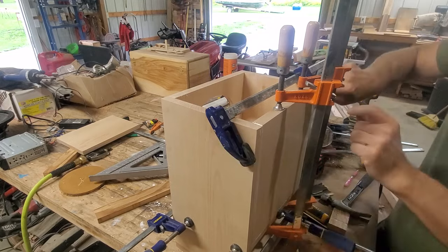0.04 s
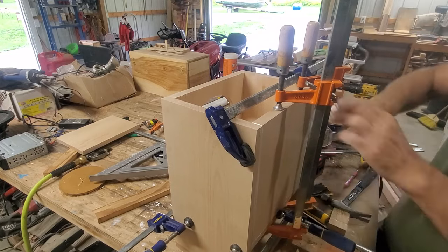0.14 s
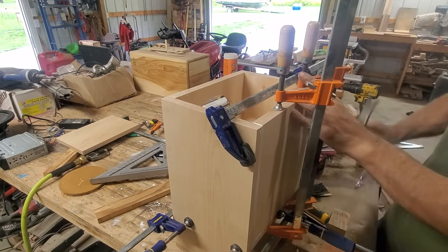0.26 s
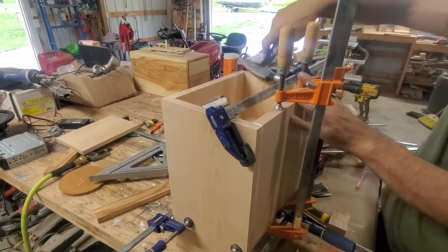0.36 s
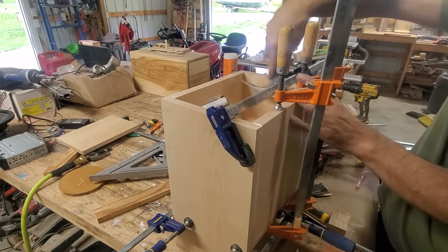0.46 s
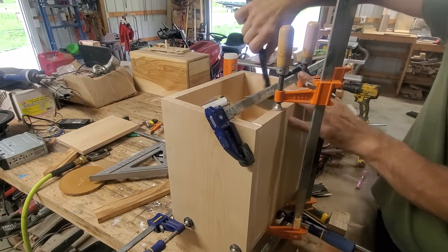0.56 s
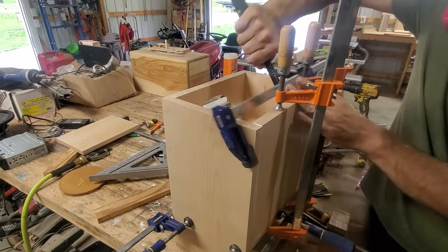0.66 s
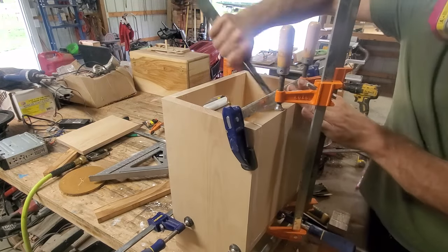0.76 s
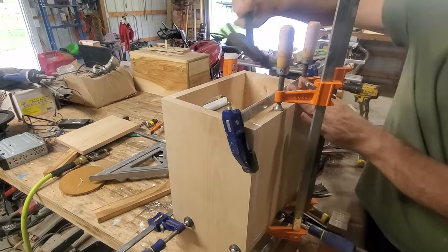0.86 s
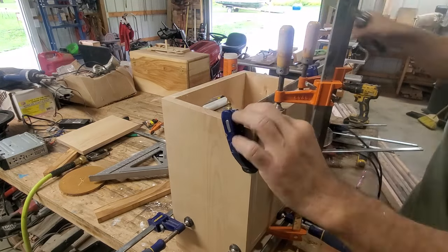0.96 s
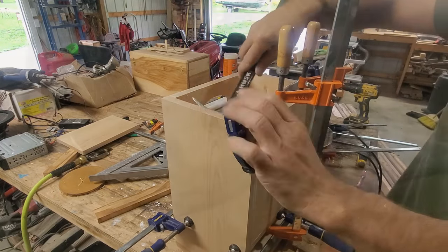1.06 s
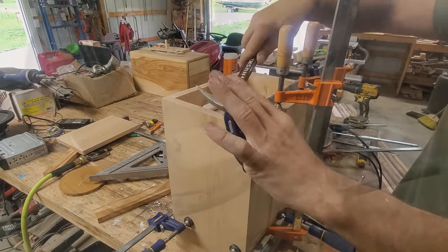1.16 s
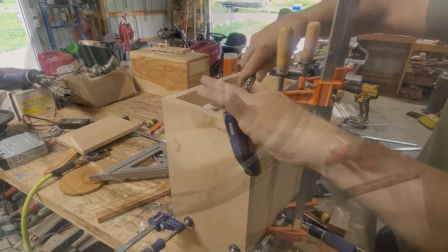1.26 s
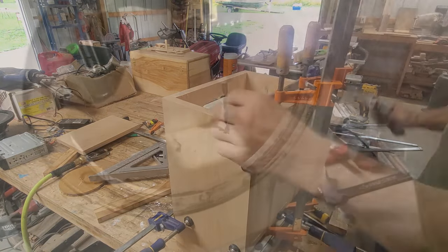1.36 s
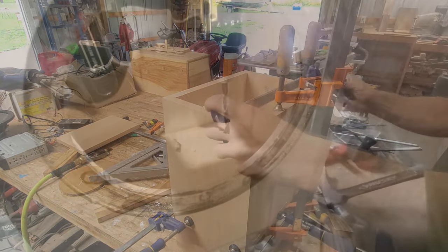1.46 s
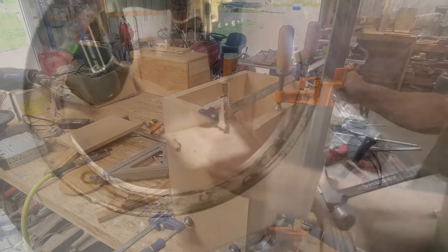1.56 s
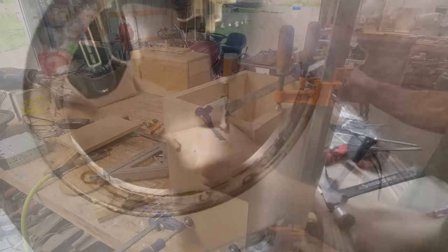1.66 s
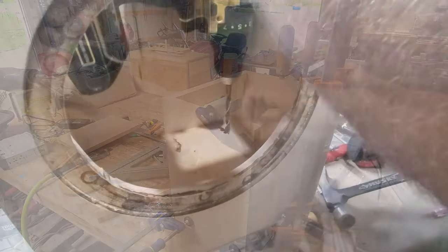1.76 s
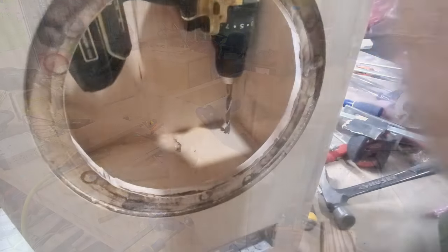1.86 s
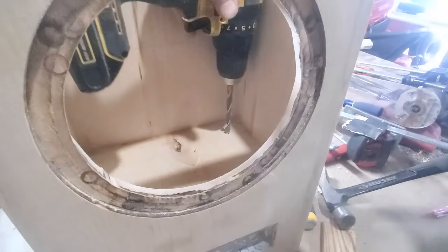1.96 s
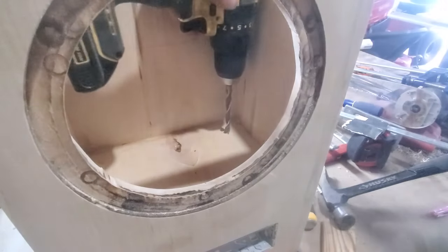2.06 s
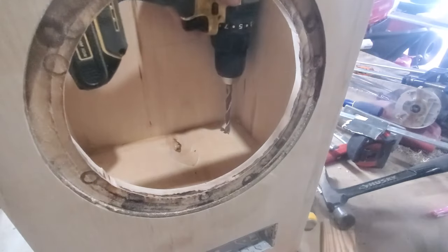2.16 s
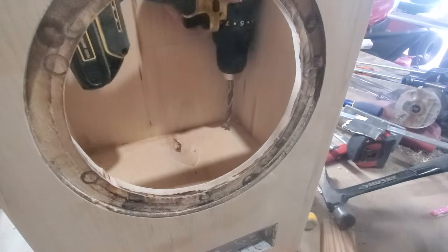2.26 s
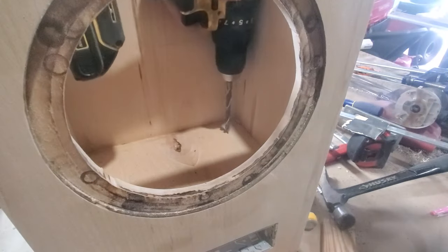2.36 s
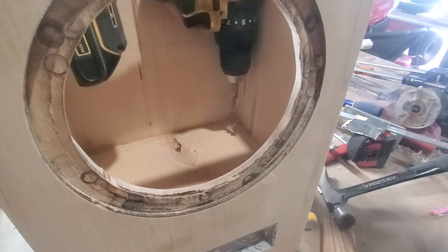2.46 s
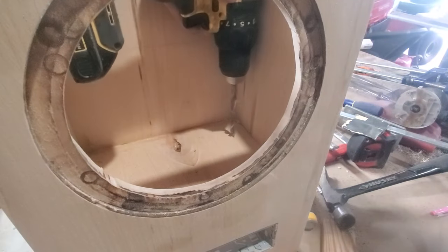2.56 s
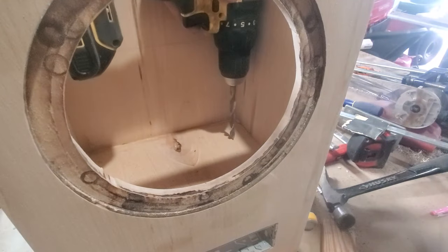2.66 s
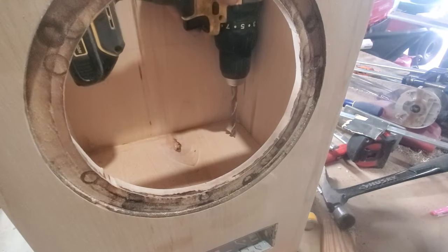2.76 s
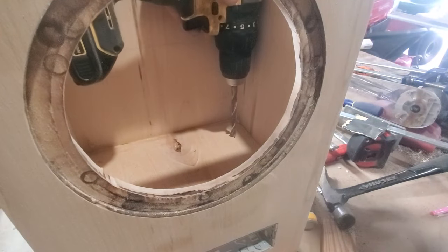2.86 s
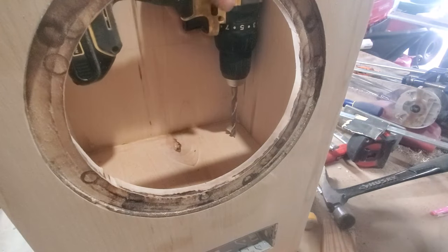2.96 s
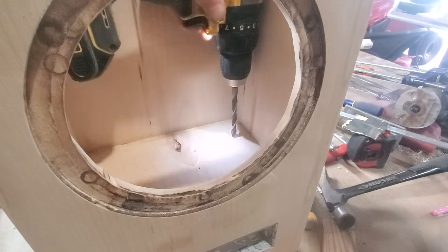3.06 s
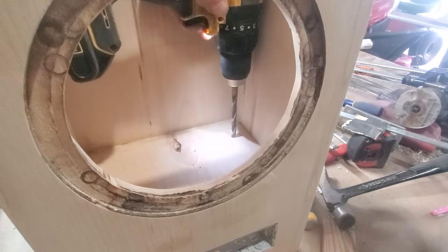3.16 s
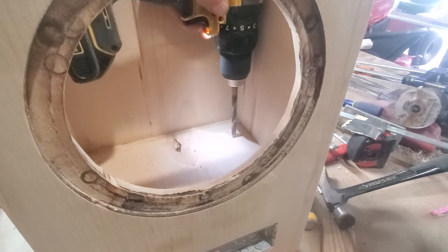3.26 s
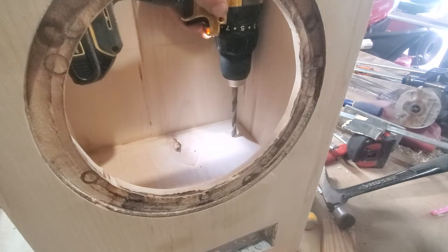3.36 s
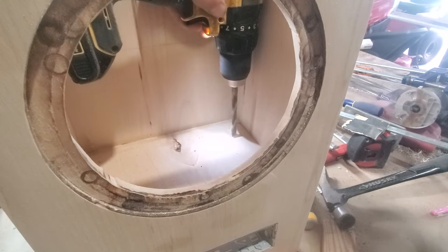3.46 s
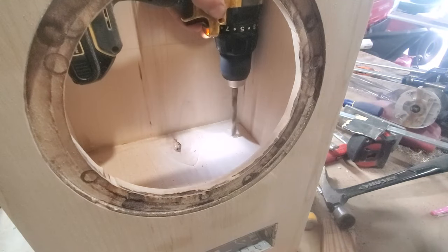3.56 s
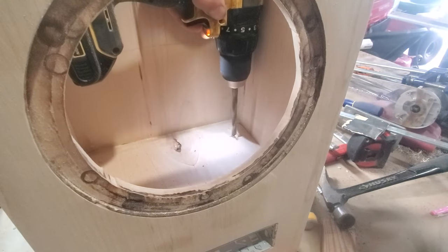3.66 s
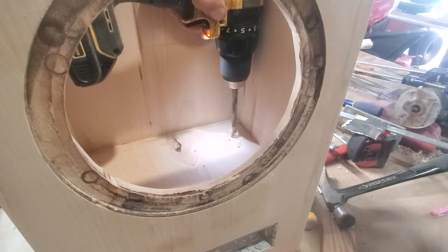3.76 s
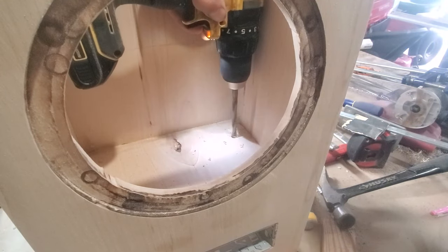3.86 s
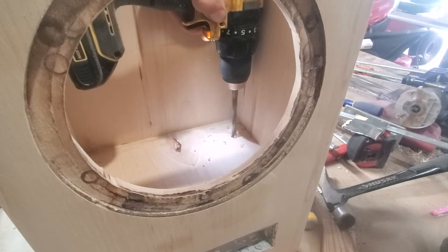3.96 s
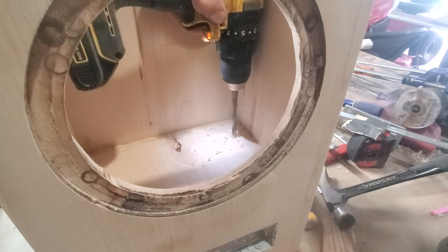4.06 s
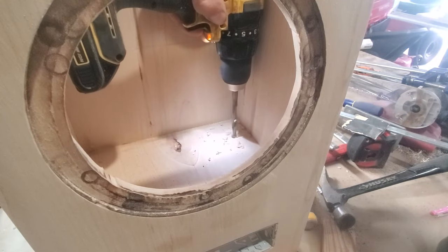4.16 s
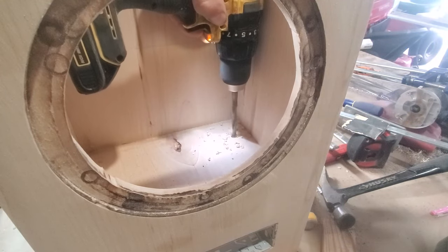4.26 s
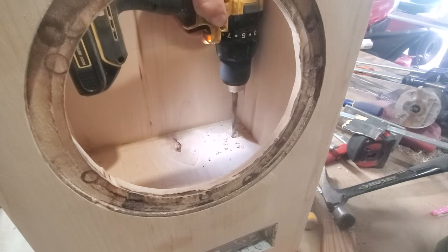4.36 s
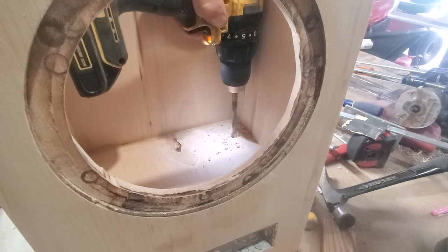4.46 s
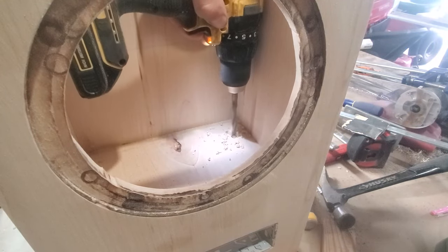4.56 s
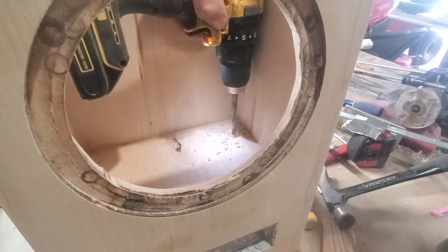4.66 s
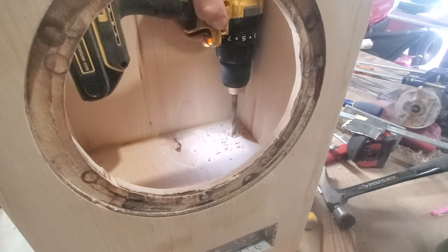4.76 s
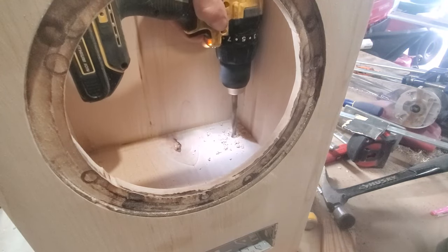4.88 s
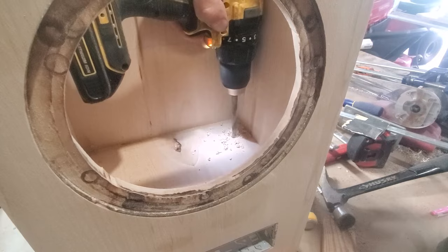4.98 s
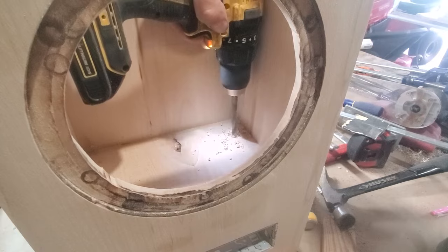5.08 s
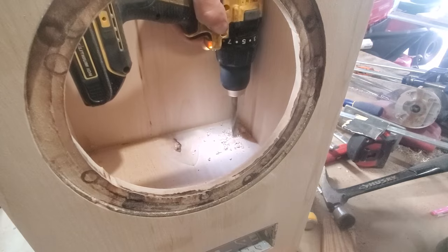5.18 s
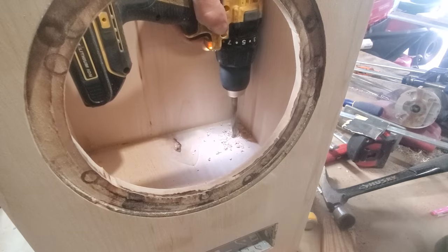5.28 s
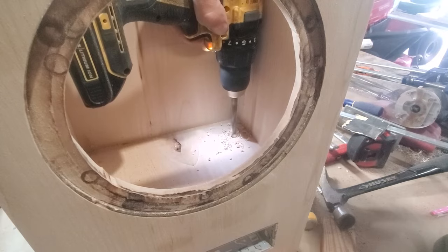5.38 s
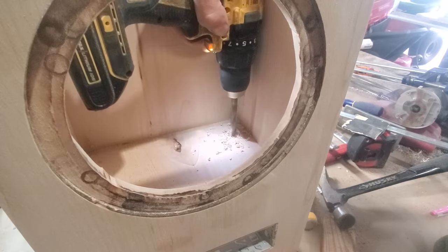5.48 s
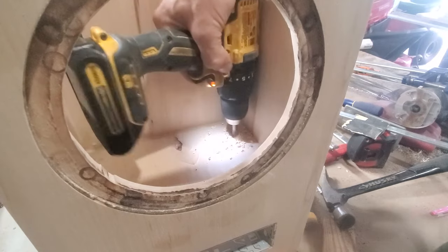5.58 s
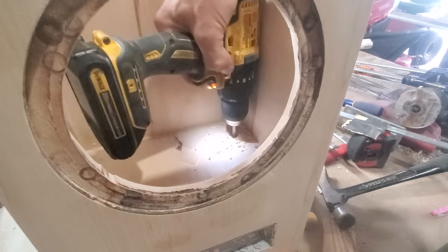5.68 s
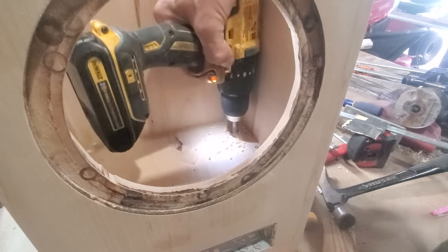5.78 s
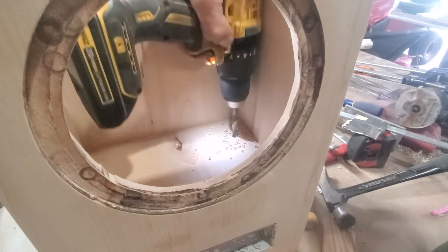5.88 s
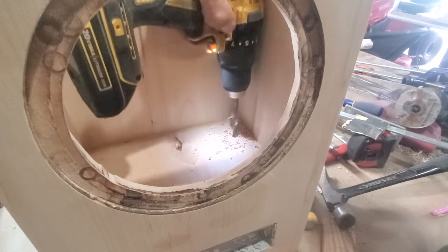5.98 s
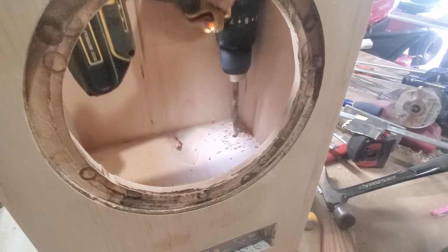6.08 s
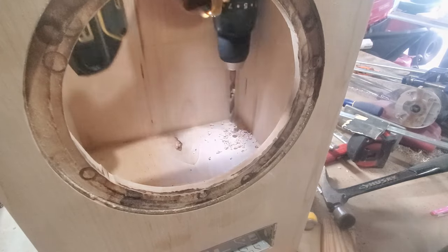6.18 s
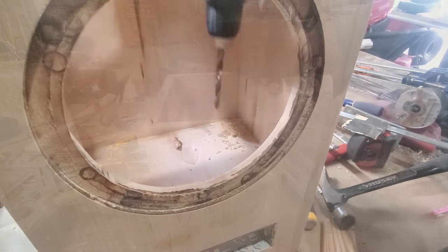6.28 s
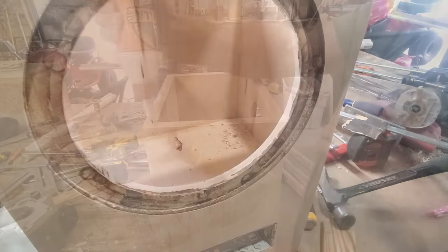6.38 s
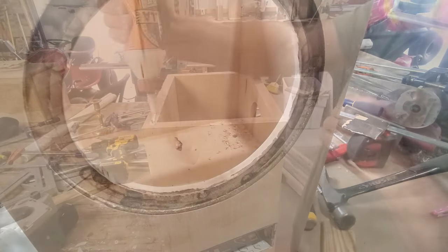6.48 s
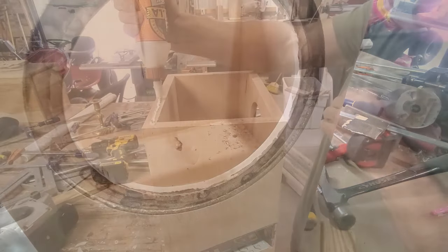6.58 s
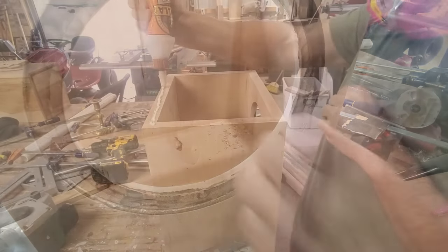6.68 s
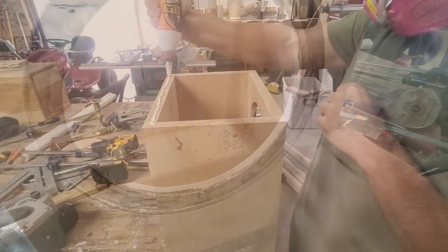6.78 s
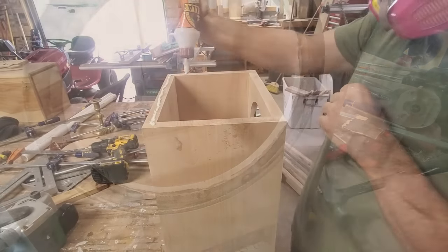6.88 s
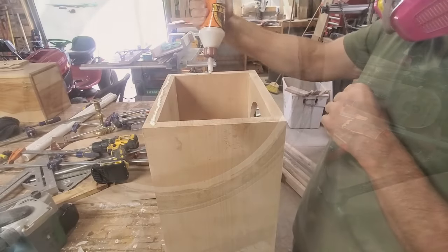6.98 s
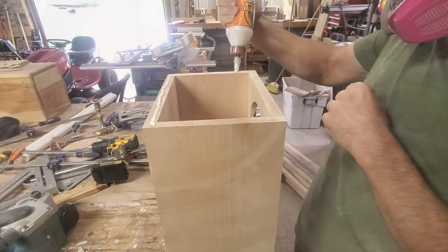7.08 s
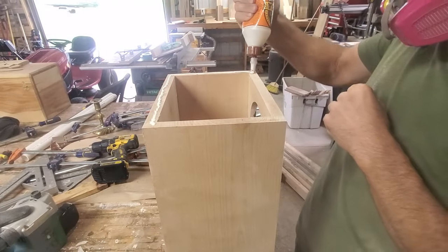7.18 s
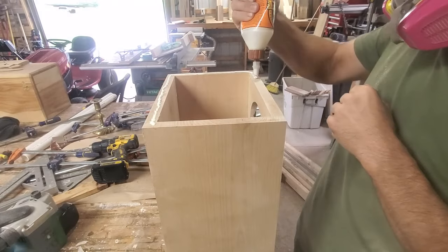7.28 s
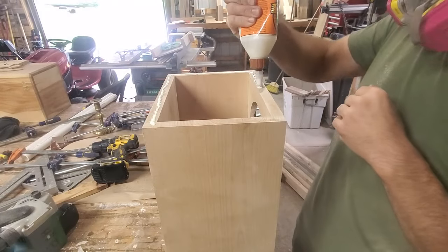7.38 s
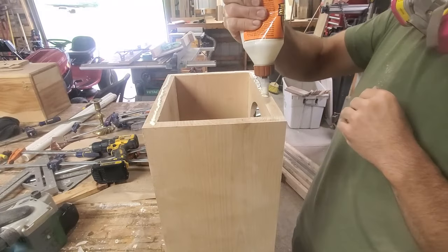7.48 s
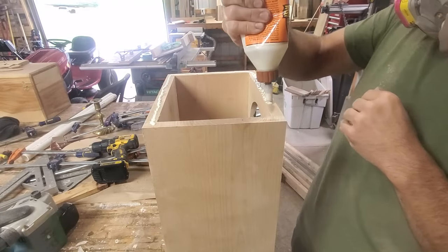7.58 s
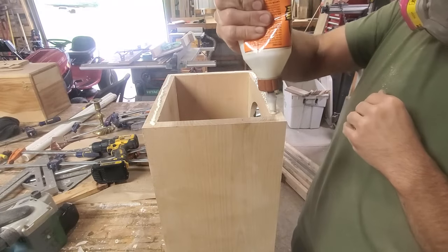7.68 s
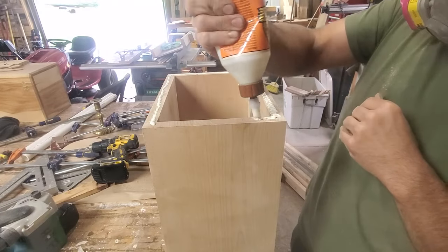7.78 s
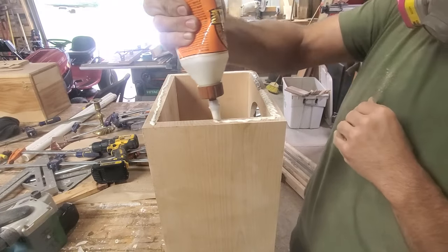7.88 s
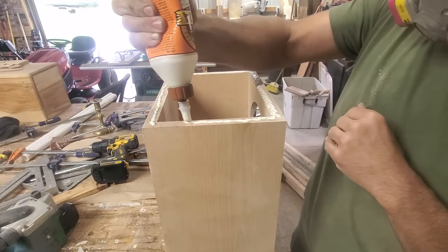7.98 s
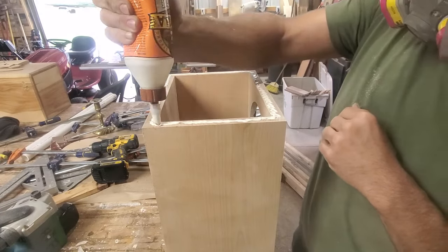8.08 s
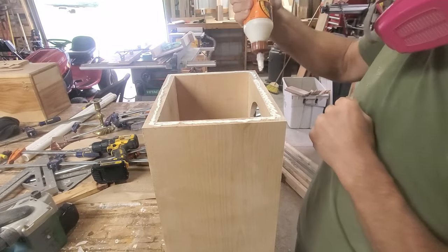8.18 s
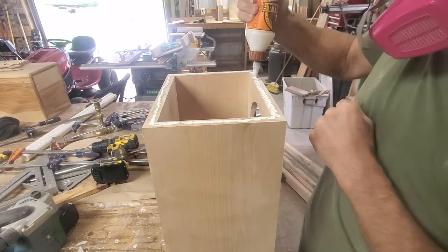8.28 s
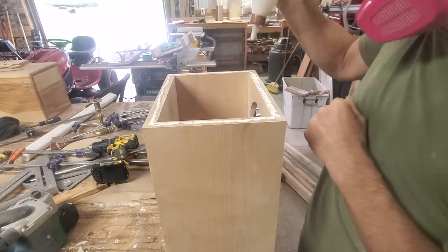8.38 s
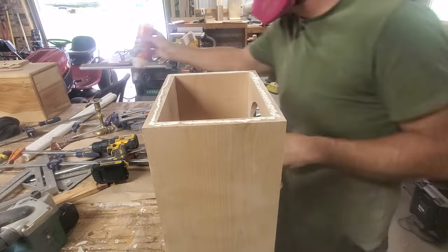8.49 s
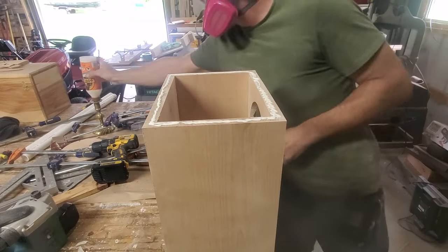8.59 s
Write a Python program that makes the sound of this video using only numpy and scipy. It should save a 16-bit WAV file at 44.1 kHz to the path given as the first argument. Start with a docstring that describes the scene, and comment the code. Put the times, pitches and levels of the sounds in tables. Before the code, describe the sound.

In a quiet workshop, bar clamps rap a plywood box in a quick irregular flurry of dry wooden knocks and metal clicks. After light rubbing and a few softer bumps, a cordless drill starts, skates, bores steadily with a gritty whine, speeds up on breaking through, squeals while withdrawn and stops abruptly. Faint handling crackles and two soft bumps follow. Close microphone, little reverberation.

```python
"""A quiet workshop: bar clamps click and knock on a plywood box in quick dry raps, made of ringing modes and noise.
A cordless drill slides into the box and bores a hole: wavering gear tones over pulsing chip noise.
It speeds up as the bit breaks through, squeals on the way back out in gliding tones and stops dead.
A glue bottle crackles faintly in short resonant noises, then two soft bumps fall on the bench."""
import sys
import numpy as np
from scipy import signal
from scipy.fft import rfft, irfft
from scipy.io import wavfile
from scipy.ndimage import uniform_filter1d

SR = 44100
rng = np.random.default_rng(int(sys.argv[2]) if len(sys.argv) > 2 else 0)


def wav_record(signal):
    """Record a signal, one row per channel, as 16-bit PCM in the file named by sys.argv[1]."""
    frames = np.transpose(np.atleast_2d(signal))
    bounded = np.clip(frames, -1, 1)
    # unit amplitude maps onto the largest positive 16-bit level
    quanta = np.round(bounded * 32767).astype(np.int16)
    wavfile.write(sys.argv[1], SR, quanta)


N = 381005
TIME = np.arange(N) / SR
LEFT_RIGHT = np.array([[1], [-1]])

# Still air of the shop. Each row: frequency in Hz, relative level per hertz in dB.
SHOP_SPECTRUM = [(20, -19), (38, -16), (77, -1), (142, -12), (228, -21), (642, -24.5), (1370, -31.5),
                 (4200, -42), (4940, -37), (5530, -46.5), (7950, -42.5), (9140, -49), (12100, -38.5),
                 (16000, -35.5)]
SHOP_DB = -60
# An even stereo balance. Each row: frequency in Hz, left minus right in dB.
CENTRE = [(20, 0), (16000, 0)]

# Knocks on the box. Each row: start in seconds, wood thud, clamp clack and metal tick in dB before
# the layer trims, favoured box pitch in Hz, favoured clamp pitch in Hz.
KNOCKS = [(0.221, -39, -41, -36, 240, 3120), (0.265, -27.5, -38, -43.5, 750, 1110),
          (0.288, -12.5, -19, -22, 775, 1260), (0.309, -21, -26.5, -36, 417, 1230),
          (0.378, -18, -34, -45, 320, 1310), (0.389, -16, -29, -30.5, 585, 1910),
          (0.402, -13, -26.5, -60, 320, 1400), (0.412, -10, -20.5, -53, 380.5, 1400),
          (0.427, -22, -29, -51, 585, 1310), (0.453, -9.5, -15, -38, 580, 2880),
          (0.475, -9, -35, -50, 320, 1103), (0.492, -9, -16.5, -41, 362.6, 1113),
          (0.523, -12.5, -22, -43, 400, 1020), (0.544, -10.5, -16, -38, 396, 1020),
          (0.587, -21.5, -34, -47.5, 322, 1210), (0.625, -26, -42, -70, 320, 1110),
          (0.646, -4, -15, -40.5, 330, 1360), (0.694, -17, -35, -50, 300, 1020),
          (0.699, -8.5, -23.5, -26.5, 593, 1020), (0.757, -10, -22, -43.5, 623, 1020),
          (0.806, -20, -34, -55, 325, 1100), (0.817, -11, -25, -49, 280, 1060),
          (1.066, -30, -28.5, -31, 273, 3140), (1.084, -11.5, -26.5, -65, 320, 1110),
          (1.101, -24, -19, -57, 750, 1310), (1.147, -18.5, -16, -36, 296, 2850),
          (1.169, -19.5, -35, -70, 488, 1110), (1.228, -29.5, -44.5, -65, 320, 1210),
          (1.248, -14.5, -17, -25, 322, 2770), (1.312, -27.5, -41, -73, 320, 1014),
          (1.408, -34, -39, -51.5, 400, 1310), (1.438, -34, -40, -52.5, 400, 1310),
          (1.456, -13, -30, -57, 400, 1020), (1.505, -33, -50, -65, 390, 1020),
          (1.531, -30, -40.5, -55, 567, 1210), (1.882, -24, -32, -54, 275, 1310),
          (1.929, -30, -54, -73, 298, 1910), (2.024, -27.5, -42.5, -57, 240, 1310),
          (2.169, -30, -45, -71, 275, 1110), (2.274, -17.5, -45, -59, 273, 1210),
          (2.447, -41.5, -66, -73, 300, 1105), (2.975, -50, -73, -77.5, 320, 1100),
          (3.126, -38.5, -30.5, -34.5, 322, 1210), (5.616, -12, -21.5, -25, 277, 3120),
          (8.384, -32, -57, -76, 275, 1024), (8.607, -39.5, -64.5, -79.5, 240, 1020),
          (8.624, -24.5, -40.5, -71, 240, 1020)]
# Low bumps of the bench. Each row: start in seconds, level in dB.
BUMPS = [(0.288, -23.5), (.525, -28), (1.101, -31.5), (1.233, -28.5), (2.027, -38), (2.279, -28.5),
         (2.785, -42), (5.555, -25.5), (5.616, -27), (6.065, -34.5), (8.391, -35)]
# Ringing of the plywood box. Each row: frequency in Hz, relative level in dB, t60 in seconds.
BOX_MODES = [(246, -4, .07), (275.5, -3, 0.045), (329, 2.5, 0.041), (393, -1, .045), (510, 0.5, 0.027),
             (587.4, -0.5, 0.042), (670, -3.5, 0.063), (754, -1.5, 0.051), (814, -5.5, 0.053)]
# Ringing of the clamp's bar and jaws. Each row: frequency in Hz, relative level in dB, t60 in seconds.
CLAMP_MODES = [(1017, 2, 0.046), (1124, 1, 0.045), (1187, -1, 0.06), (1313, 0, 0.062), (1423, -1.5, .05),
               (1890, -2.5, 0.03), (2500, -3, 0.031), (2830, -2, 0.04), (3200, -4, 0.031)]
# Colours of clamp rattle, metal tick and bench rumble. Each row: frequency in Hz, relative level per hertz in dB.
CLACK_SPECTRUM = [(500, -18), (750, -1.5), (1050, 0.5), (1350, -1.5), (1700, -4), (2100, -3.5),
                  (2500, -6.5), (2950, -4), (3600, -12), (5000, -27)]
TICK_SPECTRUM = [(2500, -15.5), (4300, 4), (5500, -2), (7500, -0.5), (10000, -6.5), (16000, -9)]
RUMBLE_SPECTRUM = [(20, -12), (50, -5), (78, 4), (110, -3.5), (180, -8.5), (300, -38.5), (900, -91)]
# trims of the knock's layers (dB)
THUD_DB, CLACK_DB, CLAMP_RING_DB, TICK_DB = -3.5, -2.5, -5, -0.5
# each contact favours the modes near one pitch: gain (dB), width (share of that pitch), loss one octave away (dB)
FAVOUR_DB, FAVOUR_WIDTH, FOCUS_DB = 8, .18, 2.5
# from here on the blows come from within the box and its air answers (Hz, s, dB)
INSIDE_FROM_S = 1.7
CAVITY_HZ, CAVITY_T60, CAVITY_DB = 292, .095, 3

# Drill and hands sliding over the wood. Each row: time in seconds, rub in dB and hiss in dB before their trims.
SLIDE = [(1.58, -49, -70), (1.63, -61, -53), (1.936, -69, -66.5), (2.092, -49.5, -56.5),
         (2.162, -47, -57.5), (2.27, -52, -62), (2.31, -62, -81.5), (2.55, -70.5, -87)]
# Colours of the slide. Each row: frequency in Hz, relative level per hertz in dB.
RUB_SPECTRUM = [(250, -1), (450, 1), (620, 3.5), (1000, -5), (1600, -18), (3000, -59)]
RUB_HISS_SPECTRUM = [(530, -36.5), (900, -2.5), (1050, -1.5), (1490, -7), (2860, -7), (5350, -17.5),
                     (10900, -24.5), (16000, -23)]

# Small sounds of hands and tools, with a knock's ring, a crack from the drill and its stopping click.
# Each row: start in seconds, length in seconds, centre in Hz, width in Hz, level in dB.
RUSTLES = [(1.864, 0.084, 530, 70, -44.5), (1.868, 0.03, 1324, 60, -33), (3.028, 0.043, 5000, 7100, -59.5),
           (3.078, 0.029, 1500, 2500, -58), (6.025, 0.028, 4800, 3500, -27.5),
           (6.237, .025, 1250, 600, -31.5), (6.436, 0.013, 1200, 700, -58.5),
           (6.719, 0.097, 2762, 896, -67.5), (7.078, .2, 600, 249.6, -68.5), (7.274, .01, 5010, 8000, -66),
           (7.479, 0.045, 3600, 80.3, -71.5), (7.678, 0.17, 572, 250, -71), (7.947, .025, 1950, 250, -66),
           (8.133, .012, 5000, 8900, -67), (8.254, 0.14, 750, 247, -58), (8.412, 0.059, 6020, 8940, -60.5),
           (8.422, 0.026, 1900, 1200, -55), (8.433, 0.071, 700, 596, -53)]
# the glue bottle crackles faintly as it is squeezed along the rim
GLUE_FROM_S, GLUE_TO_S, GLUE_CRACKLE_S = 6.7, 8.1, .018
GLUE_HZ, GLUE_WIDTH_HZ, GLUE_DB = 2300, 400, -71

# the trigger is squeezed and let go (s)
TRIGGER_ON_S, TRIGGER_OFF_S = 3.126, 6.255
# The motor sags under load and races as the bit breaks through. Each row: time in seconds, turns per second.
SPEED = [(3.16, 290), (3.25, 211), (3.32, 286), (3.43, 286), (3.55, 274), (3.64, 250), (3.72, 238),
         (3.82, 234), (3.87, 270), (3.93, 274.5), (4.07, 271), (4.2, 263), (4.52, 261.5), (4.85, 255),
         (4.98, 257), (5.02, 300), (5.07, 334), (5.13, 319), (5.25, 314), (5.37, 322), (5.51, 313),
         (5.555, 277), (5.6, 299), (5.63, 288), (5.72, 240), (5.81, 307), (5.89, 309), (5.94, 285),
         (6.02, 277), (6.1, 286), (6.19, 294)]
# How hard the bit works. Each row: time in seconds, level in dB before the trims of each layer.
EFFORT = [(3.13, -41.5), (3.15, -50.5), (3.27, -49.5), (3.31, -38.5), (3.52, -38.5), (3.58, -29),
          (3.82, -30), (3.85, -27.5), (4.97, -27), (5.0, -26), (5.55, -25.5), (5.76, -38), (5.81, -24.5),
          (5.9, -31), (6.04, -29.5), (6.1, -35.5), (6.2, -36), (6.25, -30)]
# the motor's speed when labouring and when racing (turns per s)
LOADED_SPEED, RACING_SPEED = 270, 314
# the gears are fully loaded above this effort and run free a little below it (dB)
LOADED_EFFORT_DB, FREE_BELOW_DB = -31, 6
# the bit is leant on harder from here until it is through, then is pulled back with the gears slack
LEAN_S, LEAN_RISE_S, PULL_BACK_S, PULL_BACK_FALL_S = 4.3, .03, 5.52, .4
GEAR_DB, LEAN_GAIN_DB, SLACK_DB, MESH_DB = -4, 1.5, 7, 1
# lowest level of the gear train, before the trims of its tones (dB)
IDLE_MESH_DB = -40
# gearing of the chuck, and the share by which the load makes the speed wobble
MOTOR_TURNS_PER_CHUCK_TURN, WOBBLE = 20, .0025
# spread of a tone's wandering phase at each ear (radians)
PHASE_WANDER_RAD = .25
# The motor's whine. Each row: time in seconds, level in dB.
WHINE = [(3.27, -62), (3.36, -35), (3.5, -47), (3.62, -38), (3.77, -33), (3.83, -38), (3.86, -25),
         (4.6, -25.3), (4.85, -32), (5.1, -30.5), (5.55, -31), (5.6, -26), (5.7, -48), (5.88, -40),
         (5.9, -23.5), (5.95, -38), (6.03, -35), (6.1, -41), (6.15, -28), (6.215, -28), (6.23, -44)]
# Lesser tones of motor and gear train. Each row: multiple of the turning rate, then trims in dB
# running free, while cutting and when racing.
GEAR_ORDERS = [(.75, -28, -21, -13), (2, -20, -11.5, -30), (2.25, -22, -14, -28), (3, -9.5, -18, -5),
               (3.45, -11, -28, -30), (3.75, -28, -17, -22), (6, -17, -15, -19), (9.38, -22, -12, -6),
               (19.6, -28, -14.5, -6.5), (29.4, -26, -15.5, -10), (39.2, -26, -15, -23)]
# Gearbox resonances that lift the main gear tone. Each row: centre in Hz, width in Hz, lift in dB.
GEARBOX = [(1025, 40, 4.5), (1290, 70, 1.5)]
# Housing resonances that lift the lesser gear tones. Each row: centre in Hz, width in Hz, lift in dB.
HOUSING = [(300, 120, 5), (550, 120, 4), (980, 180, 6), (2950, 500, 5), (5140, 200, 7), (6300, 700, 3),
           (7730, 200, 8)]

# Bit and chuck ringing as the tip skates.
# Each row: centre in Hz, width in Hz, level in dB at the labouring speed and above.
SKATING = [(328.5, 50, -49), (1343, 150, -45), (1600, 160, -45.5), (3470, 600, -38), (6330, 150, -41.5)]
SKATE_UNTIL_S, SKATE_FADE_S = 3.55, .15
# loss for every 30 turns per s below the labouring speed (dB)
SKATE_SAG_DB = 7.5

# Colours of box drone, cutting and flying chips. Each row: frequency in Hz, relative level per hertz in dB.
DRONE_SPECTRUM = [(88, -48), (150, -15), (182, -10.5), (240, -10.5), (312, 2.5), (360, -5), (450, -7),
                  (510, -4), (580, -5), (635, -10.5), (800, -13.5), (1040, -44.5), (1760, -120)]
CUTTING_SPECTRUM = [(410, -38), (700, -15.5), (863, -10), (936, -4), (1050, -2.5), (1150, -6), (1310, -8),
                    (1480, -12), (1590, -9), (1740, -11), (2310, -8), (3180, -5.5), (3450, -8.5),
                    (4800, -11.5), (6240, -49.5), (10600, -120)]
CHIP_SPECTRUM = [(2470, -30.5), (4200, -3), (4620, -21), (5020, 0), (5560, 0), (6250, 1.5), (8550, -4),
                 (9300, -4), (15100, -5), (16000, -23.5)]
# Where the drill sits. Each row: frequency in Hz, left minus right in dB.
DRILL_SIDE = [(60, -2), (200, -5.5), (380, -5), (700, 5.5), (1290, -6.5), (2380, -3), (4400, -1.5),
              (8120, -6.5), (15000, 0)]
# trims of the boring layers against the effort; BORING_DB then trims them all
CUTTING_DB, CHIPS_DB, DRONE_DB, RUMBLE_DB, BORING_DB = 6.5, 3, -1, -18.5, -1
# racing throws more chips than it cuts; box and bench fall quiet faster than the bit as it eases off
RACING_DULLS_DB, FULL_EFFORT_DB, BODY_FOLLOWS, RACING_SHAKES_DB = 1.5, -26.5, 1.25, 5
# swing of the noise as each flute bites, in the chips and in the box, and its fast crunch (dB)
FLUTE_CHIPS_DB, FLUTE_BOX_DB, CRUNCH_DB = .7, 2, 1.1

# Short wavering drill tones: box hums, groans and squeals of the bit, and a falling gear tone.
# Each row: start in seconds, length in seconds, start pitch in Hz, end pitch in Hz, level in dB.
SQUEALS = [(3.575, .12, 820, 730, -33), (3.636, 0.096, 562, 548, -26), (3.708, 0.086, 320, 288, -31),
           (4.6, 0.37, 314, 313, -30.5), (4.692, 0.31, 191, 189, -36), (5.007, 0.071, 305, 288, -22),
           (5.33, 0.079, 250, 231, -29), (5.513, 0.062, 2930, 2525, -19), (5.796, 0.086, 290, 280, -27.5),
           (5.934, 0.042, 309.4, 310, -34), (5.979, .1, 5060, 5120, -22), (6.022, 0.024, 1844, 2040, -16.5),
           (6.026, 0.021, 2176, 2560, -13)]

CUTOFF_HZ = 16100


def from_db(db):
    """Decibels to gain."""
    return 10 ** (np.asarray(db) / 20)


def rms_one(x):
    """Scale to unit rms."""
    return x / np.sqrt(np.mean(x ** 2) + 1e-20)


def peak_one(x):
    """Scale each channel so that its loudest few milliseconds have rms 1."""
    power = uniform_filter1d(x ** 2, size=256)
    return x / np.sqrt(power.max(axis=-1, keepdims=True) + 1e-20)


def in_time(rows):
    """Each column of a curve table, sample by sample."""
    s, *columns = np.transpose(rows)
    return [np.interp(TIME, s, column) for column in columns]


def at_hz(points, hz):
    """Read a spectrum on a log-frequency axis."""
    f, value = np.transpose(points)
    return np.interp(np.log(hz + 1e-3), np.log(f), value)


def ramp(start, length):
    """Rises from 0 to 1 and stays there."""
    return np.clip((TIME - start) / length, 0, 1)


def gate(start, stop, rise, t60):
    """Opens quickly at start and dies away after stop."""
    return ramp(start, rise) * from_db(-60 * np.maximum(TIME - stop, 0) / t60)


def blow(t, rise, t60):
    """Envelope of one contact: a brief swell, then a decay."""
    return np.minimum(t / rise, 1) ** 1.3 * from_db(-60 * np.maximum(t - rise, 0) / t60)


def drift(rate):
    """Random wander: normal values of spread 1, rate of them a second, joined by straight lines."""
    knots = rng.standard_normal(N // 20)
    return np.interp(TIME * rate, np.arange(len(knots)), knots)


def white():
    """Stereo noise, unrelated in the two channels."""
    return rng.standard_normal((2, N))


def colour(x, spectrum, side=CENTRE):
    """Give a stereo sound a spectrum and a balance; rms 1."""
    hz = np.arange(N // 2 + 1) * SR / N
    db = at_hz(spectrum, hz) + LEFT_RIGHT * at_hz(side, hz) / 2
    return rms_one(irfft(rfft(x) * from_db(db), N))


def resonant_noise(hz, width_hz, size):
    """Stereo noise through one two-pole resonance; rms 1."""
    r = np.exp(-np.pi * width_hz / SR)
    poles = [1, -2 * r * np.cos(2 * np.pi * hz / SR), r * r]
    return rms_one(signal.lfilter([1, 0, -1], poles, rng.standard_normal((2, size))))


def lift(hz, centre_hz, width_hz, peak_db):
    """Decibels that a tone gains near a resonance."""
    return peak_db / (1 + (2 * (hz - centre_hz) / width_hz) ** 2)


def soften(x, top_hz):
    """Gentle treble roll-off above top_hz."""
    return signal.sosfilt(signal.butter(1, top_hz, fs=SR, output="sos"), x)


def workshop(x, t60, wet_db, wall_hz):
    """Add diffuse reflections from nearby walls and clutter, duller than the direct sound."""
    t = TIME[:SR // 2]
    tail = rng.standard_normal((2, len(t))) * blow(t, rise=.012, t60=t60)
    tail = soften(tail, wall_hz)
    tail /= np.sqrt(np.sum(tail ** 2, axis=1, keepdims=True))
    return x + from_db(wet_db) * signal.fftconvolve(x, tail, axes=1)[:, :N]


def shop_air():
    """Still air of the shop: quiet coloured noise whose level drifts a little."""
    return from_db(SHOP_DB + .76 * drift(4)) * colour(white(), SHOP_SPECTRUM)


def swing(t, hz):
    """A mode's sine at a random phase, reaching the two ears a quarter cycle apart."""
    ear_phase = rng.choice([-1, 1]) * LEFT_RIGHT * np.pi / 4
    return np.sin(2 * np.pi * (hz * t + rng.random()) + ear_phase)


def ringing(t, modes, favoured_hz):
    """One contact on a body: its modes ring, those near the favoured pitch the most."""
    out = 0
    for hz, db, t60 in modes:
        db = db + lift(hz, favoured_hz, FAVOUR_WIDTH * favoured_hz, FAVOUR_DB)
        db = db - FOCUS_DB * np.log2(hz / favoured_hz) ** 2
        level = from_db(db + rng.normal(0, 2.0, (2, 1)))
        out = out + level * blow(t, rise=.0038, t60=t60) * swing(t, hz)
    return peak_one(out)


def knocks():
    """Each knock rings the box, rings and rattles the clamp and ticks; low bench bumps sound at their own times."""
    t = TIME[:SR // 4]
    out = np.zeros((2, N + len(t)))
    # noise beds, wrapped round so that the last blows can ring out
    clamp, metal, bench = (np.pad(colour(white(), spectrum), ((0, 0), (0, len(t))), "wrap")
                           for spectrum in (CLACK_SPECTRUM, TICK_SPECTRUM, RUMBLE_SPECTRUM))
    for s, thud_db, clack_db, tick_db, box_hz, clamp_hz in KNOCKS:
        span = slice(int(s * SR), int(s * SR) + len(t))
        wood = ringing(t, BOX_MODES, box_hz)
        if s > INSIDE_FROM_S:
            wood = wood + from_db(CAVITY_DB) * blow(t, rise=.0076, t60=CAVITY_T60) * swing(t, CAVITY_HZ)
        # a harder contact rattles the clamp both more and brighter
        top_hz = np.clip(4300 * 2 ** ((clack_db - thud_db) / 10), 1200, 8000)
        rattle = soften(clamp[:, span], top_hz) * blow(t, rise=.0036, t60=.054)
        tick = metal[:, span] * blow(t, rise=.0049, t60=.04)
        out[:, span] += from_db(thud_db + THUD_DB) * peak_one(wood)
        out[:, span] += from_db(clack_db + CLAMP_RING_DB) * ringing(t, CLAMP_MODES, clamp_hz)
        out[:, span] += from_db(clack_db + CLACK_DB) * peak_one(rattle)
        out[:, span] += from_db(tick_db + TICK_DB) * peak_one(tick)
    for s, db in BUMPS:
        span = slice(int(s * SR), int(s * SR) + len(t))
        out[:, span] += from_db(db) * peak_one(bench[:, span] * blow(t, rise=.018, t60=.085))
    # the clamps sit a little to the left, the work inside the box to the right
    side_db = np.where(TIME < INSIDE_FROM_S, 2.2, -3.5)
    placed = out[:, :N] * from_db(LEFT_RIGHT * side_db / 2)
    return workshop(placed, t60=.063, wet_db=-20, wall_hz=6000)


def slide():
    """Light rubbing on the plywood while the drill is brought into place: two noises of unsteady level."""
    rub_db, hiss_db = in_time(SLIDE)
    rub = from_db(rub_db + 5) * colour(white(), RUB_SPECTRUM)
    hiss = from_db(hiss_db + 4) * colour(white(), RUB_HISS_SPECTRUM)
    return (rub + hiss) * from_db(1.7 * drift(50.05)) * gate(1.59, 2.59, rise=.038, t60=.58)


def glue_crackles(count):
    """Faint crackles at random moments: rows like those of the rustles."""
    return [(s, GLUE_CRACKLE_S, GLUE_HZ * 2 ** (.22 * rng.normal()), GLUE_WIDTH_HZ, GLUE_DB)
            for s in rng.uniform(GLUE_FROM_S, GLUE_TO_S, count)]


def rustles():
    """Small sounds of hands and tools and the glue's crackles: short swells of noise in one resonance."""
    out = np.zeros((2, N))
    for s, length, hz, width_hz, db in RUSTLES + glue_crackles(count=12):
        swell = np.hanning(int(length * SR))
        span = slice(int(s * SR), int(s * SR) + len(swell))
        out[:, span] += from_db(db) * swell * resonant_noise(hz, width_hz, size=len(swell))
    return out


def racing_share(speed):
    """0 while the motor labours, 1 when it races."""
    return np.clip((speed - LOADED_SPEED) / (RACING_SPEED - LOADED_SPEED), 0, 1)


def chuck_angle(speed):
    """Angle of the chuck, geared down from the motor (radians)."""
    return 2 * np.pi * np.cumsum(speed) / SR / MOTOR_TURNS_PER_CHUCK_TURN


def tone(hz, waver_db, blur_hz):
    """A wavering line of rms near 1; its strength and phase wander separately at each ear."""
    phase = 2 * np.pi * np.cumsum(hz + blur_hz * drift(260)) / SR
    ears = []
    for ear in LEFT_RIGHT:
        strength = np.sqrt(2) * from_db(waver_db * drift(40))
        ears.append(strength * np.sin(phase + PHASE_WANDER_RAD * drift(5) + ear * np.pi / 4))
    return np.array(ears)


def motor():
    """Gear tone and whine wobble with the chuck; lesser orders shift with load and swell at housing resonances."""
    speed, = in_time(SPEED)
    effort_db, = in_time(EFFORT)
    whine_db, = in_time(WHINE)
    racing = racing_share(speed)
    free = np.clip((LOADED_EFFORT_DB - effort_db) / FREE_BELOW_DB, 0, 1)
    pulled = ramp(PULL_BACK_S, PULL_BACK_FALL_S)
    leaning = ramp(LEAN_S, LEAN_RISE_S) * (1 - pulled)
    # the wood drags on the bit once per turn and once per flute
    angle = chuck_angle(speed)
    speed = speed * (1 + WOBBLE * (1 - free) * (np.sin(angle) + np.sin(2 * angle)))
    # the gear train sings as far as its teeth are pressed together, down to a floor
    mesh_db = np.maximum(effort_db - RACING_DULLS_DB * racing - SLACK_DB * pulled, IDLE_MESH_DB)
    gear_hz, whine_hz = 4 * speed, 12 * speed
    gear_db = mesh_db + GEAR_DB + LEAN_GAIN_DB * leaning - SLACK_DB * free / 2
    gear_db = gear_db + sum(lift(gear_hz, *resonance) for resonance in GEARBOX)
    out = from_db(gear_db) * tone(gear_hz, waver_db=2.6, blur_hz=9)
    out += from_db(whine_db) * tone(whine_hz, waver_db=1.5, blur_hz=3)
    for order, free_trim_db, cutting_trim_db, racing_trim_db in GEAR_ORDERS:
        hz = order * speed
        loaded_trim_db = (1 - racing) * cutting_trim_db + racing * racing_trim_db
        db = mesh_db + MESH_DB + free * free_trim_db + (1 - free) * loaded_trim_db
        db = db + sum(lift(hz, *resonance) for resonance in HOUSING)
        # play in the gears smears the high orders most
        blur_hz = 5 + .011 * order ** 2.6 * (1 + 6 * racing)
        out += from_db(db) * tone(hz, waver_db=3, blur_hz=blur_hz)
    # a little to the right
    return out * from_db(-1.1 * LEFT_RIGHT)


def skating():
    """The tip scrapes round on the surface, more weakly while the motor sags, then fades out."""
    speed, = in_time(SPEED)
    sag = (np.minimum(speed, LOADED_SPEED) - LOADED_SPEED) / 30
    level = from_db(SKATE_SAG_DB * sag) * (1 - ramp(SKATE_UNTIL_S, SKATE_FADE_S))
    return level * sum(from_db(db) * resonant_noise(hz, width_hz, size=N) for hz, width_hz, db in SKATING)


def grains(per_s, spread_db):
    """Wood fibres snapping: dense clicks of uneven size."""
    return white() * (rng.random((2, N)) < per_s / SR) * from_db(spread_db * drift(700))


def boring():
    """The flutes tear fibres and throw chips, pulsing with the chuck; box and bench shake along."""
    speed, = in_time(SPEED)
    effort_db, = in_time(EFFORT)
    racing = racing_share(speed)
    force_db = effort_db - RACING_DULLS_DB * racing
    body_db = FULL_EFFORT_DB + BODY_FOLLOWS * (force_db - FULL_EFFORT_DB)
    flutes = np.sin(2 * chuck_angle(speed))
    bite_db = FLUTE_CHIPS_DB * flutes + CRUNCH_DB * drift(220)
    # pulled back, the bit no longer bears on the box
    unloaded_db = 4 * ramp(PULL_BACK_S, PULL_BACK_FALL_S)
    cutting_db = force_db + CUTTING_DB + bite_db
    chips_db = effort_db + CHIPS_DB + bite_db
    drone_db = body_db + DRONE_DB - unloaded_db + FLUTE_BOX_DB * flutes + 1.9 * drift(25)
    rumble_db = body_db + RUMBLE_DB + RACING_SHAKES_DB * racing + 4.8 * drift(22)
    cutting = from_db(cutting_db) * colour(grains(14000, spread_db=1), CUTTING_SPECTRUM, DRILL_SIDE)
    chips = from_db(chips_db) * colour(grains(22000, spread_db=.5), CHIP_SPECTRUM, DRILL_SIDE)
    drone = from_db(drone_db) * colour(white(), DRONE_SPECTRUM, DRILL_SIDE)
    rumble = from_db(rumble_db) * colour(white(), RUMBLE_SPECTRUM)
    return cutting + chips + drone + rumble


def plywood_walls(x):
    """Quick reflections inside the box make the noise hollow; their pattern shifts as the drill moves."""
    first, second = (workshop(x, t60=.015, wet_db=-8, wall_hz=12000) - x for _ in range(2))
    shift = 2 * drift(4)
    return x + np.cos(shift) * first + np.sin(shift) * second


def squeals():
    """Short wavering drill tones that glide in pitch: box hums, groans and squeals of the bit, a falling gear tone."""
    out = np.zeros((2, N))
    for s, length, start_hz, end_hz, db in SQUEALS:
        along = ramp(s, length)
        hz = start_hz + (end_hz - start_hz) * along
        out += from_db(db) * np.sin(np.pi * along) * tone(hz, waver_db=5.5, blur_hz=np.sqrt(start_hz))
    return out


def drill():
    """The trigger gates motor, skating and boring; the squeals join them in the workshop's reflections."""
    trigger = gate(TRIGGER_ON_S, TRIGGER_OFF_S, rise=.0066, t60=.036)
    boxed = from_db(BORING_DB) * plywood_walls(boring())
    running = trigger * (motor() + skating() + boxed)
    return workshop(running + squeals(), t60=.179, wet_db=-21, wall_hz=6000)


def scene():
    """Knocks, handling and the drill over the still air of the shop."""
    return shop_air() + knocks() + slide() + rustles() + drill()


def record(dry):
    """Peaks are clipped at full scale, then a steep low-pass cuts the top."""
    low_pass = signal.ellip(12, .1, 90, CUTOFF_HZ, fs=SR, output="sos")
    return signal.sosfilt(low_pass, np.clip(dry, -1, 1))


dry = scene()
out = record(dry)
wav_record(out)
```